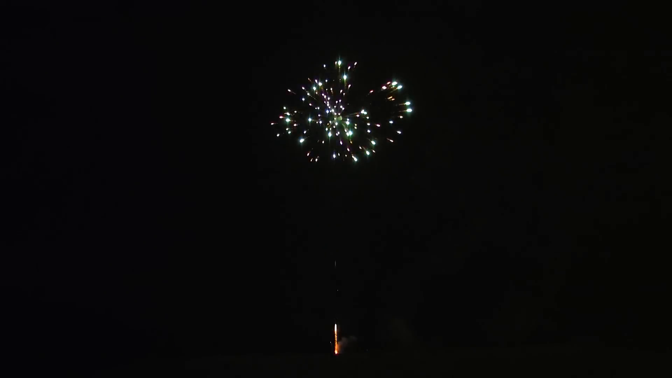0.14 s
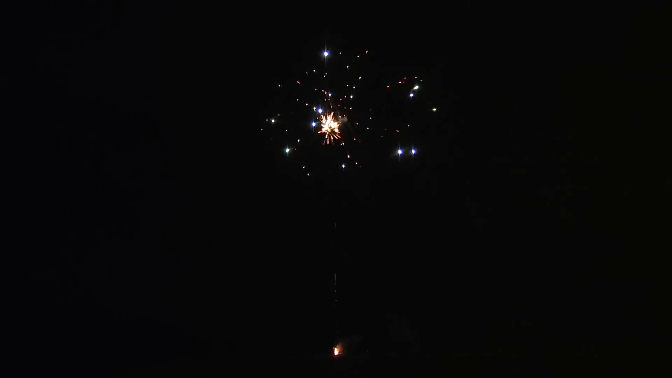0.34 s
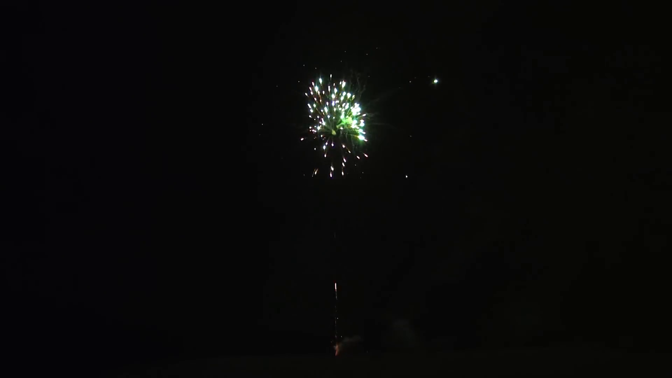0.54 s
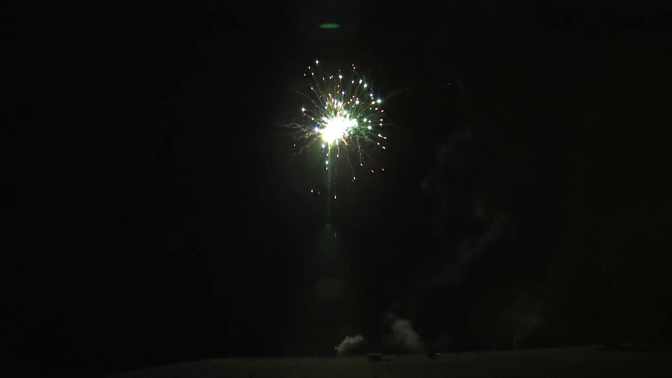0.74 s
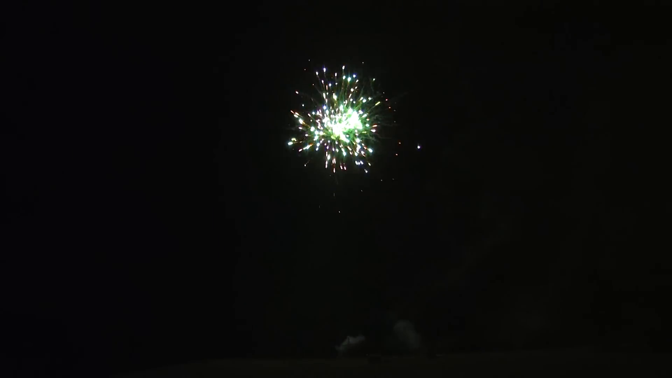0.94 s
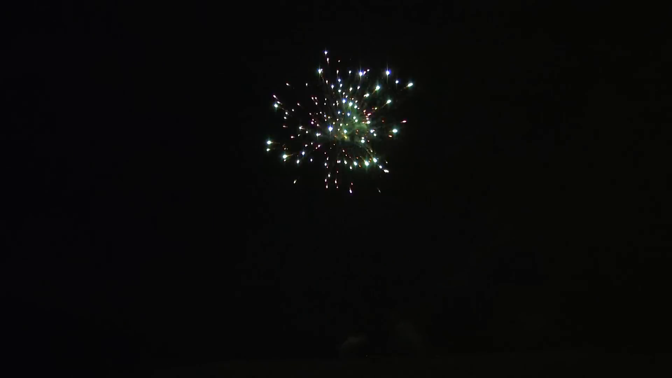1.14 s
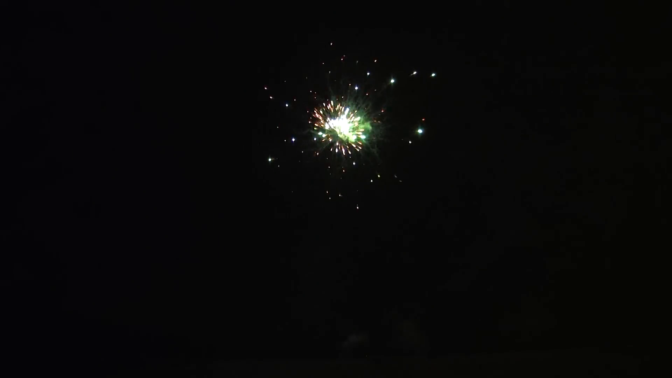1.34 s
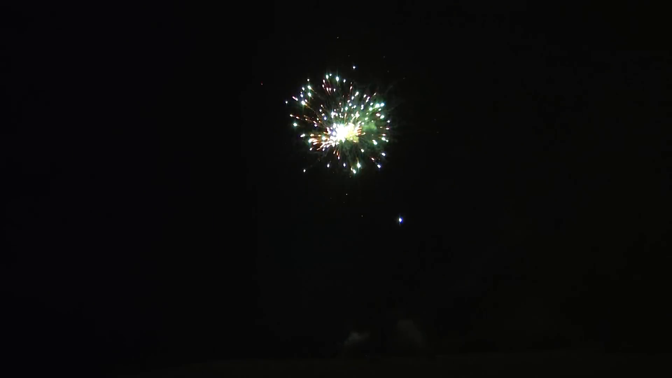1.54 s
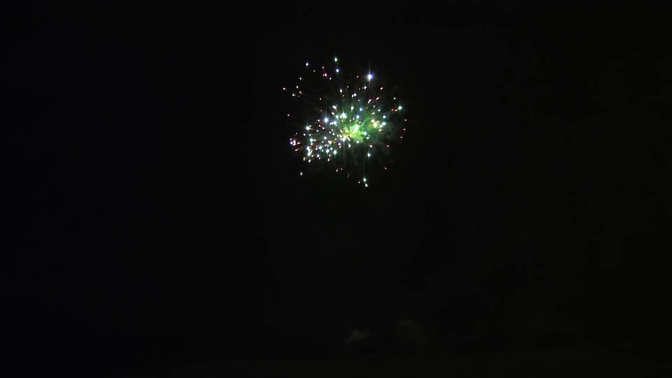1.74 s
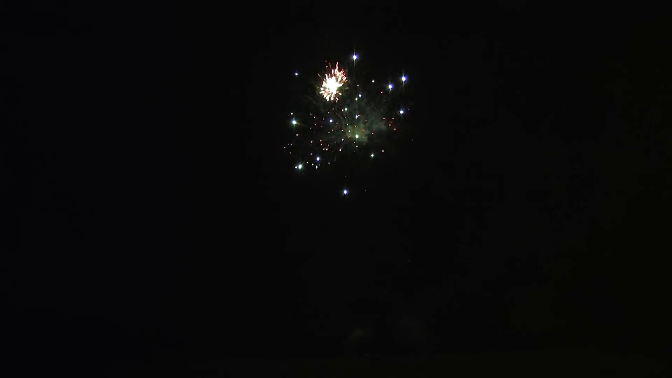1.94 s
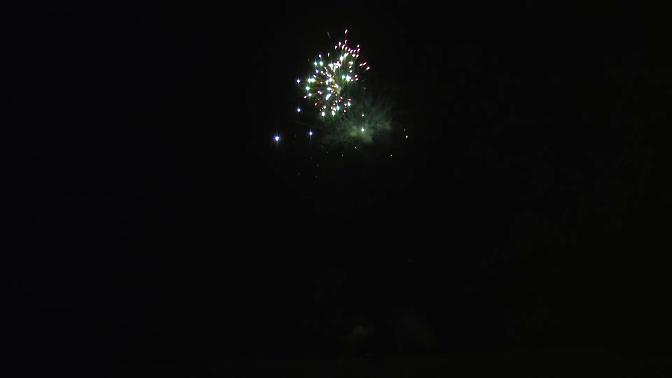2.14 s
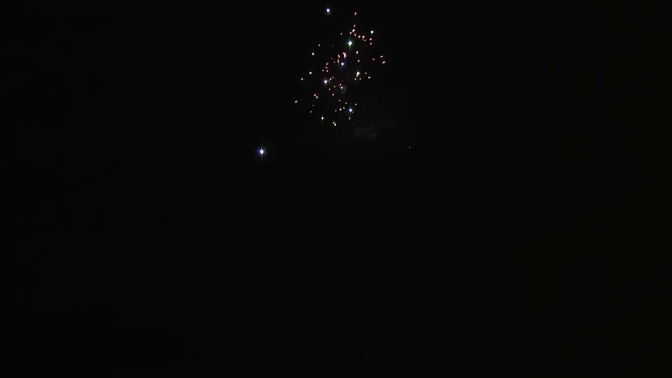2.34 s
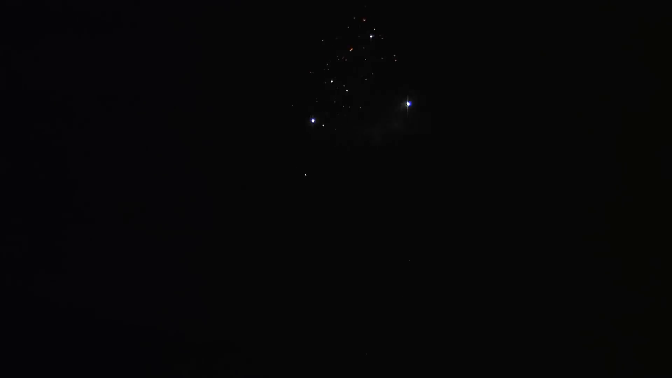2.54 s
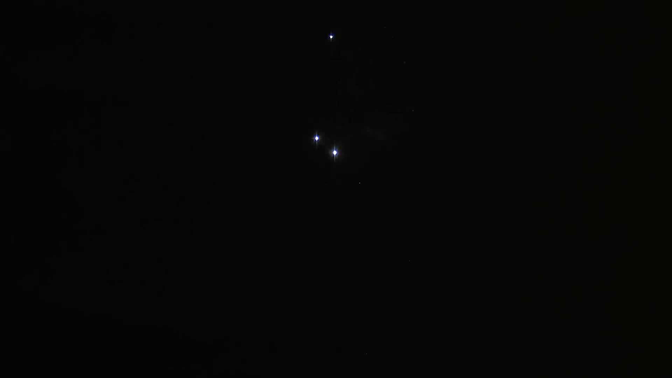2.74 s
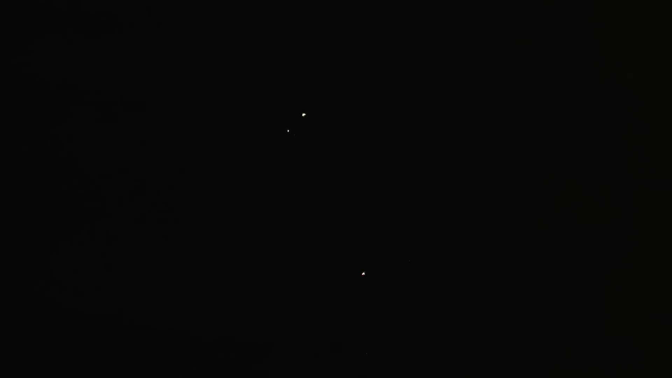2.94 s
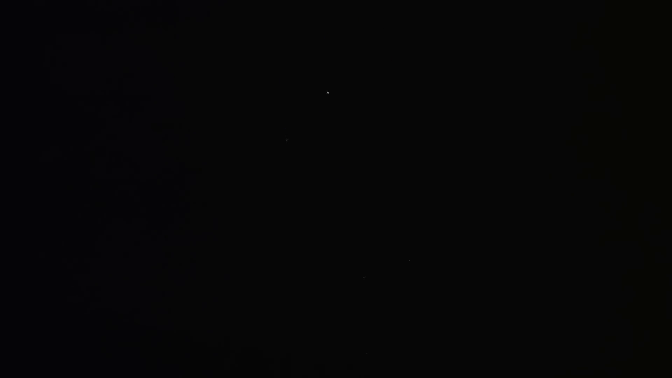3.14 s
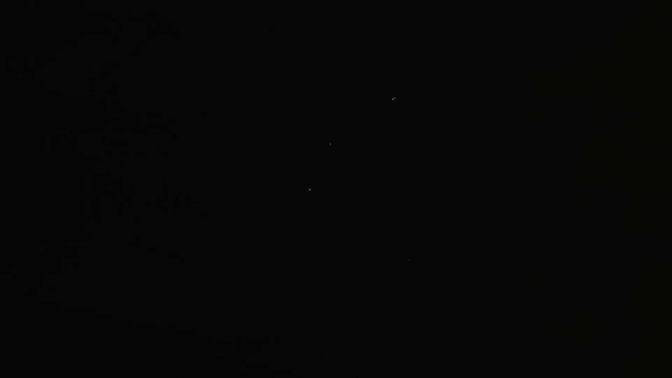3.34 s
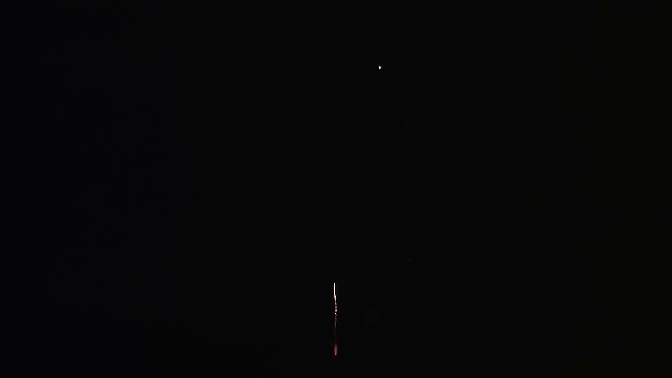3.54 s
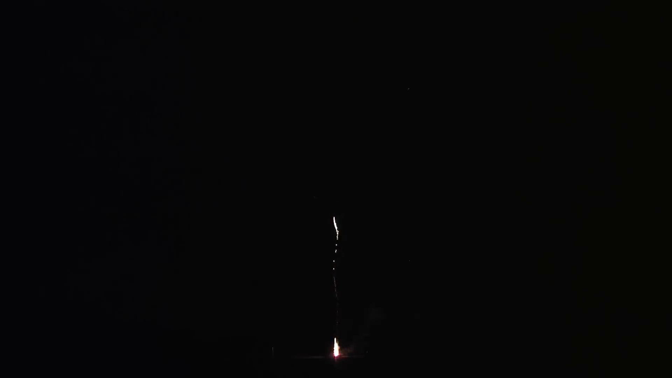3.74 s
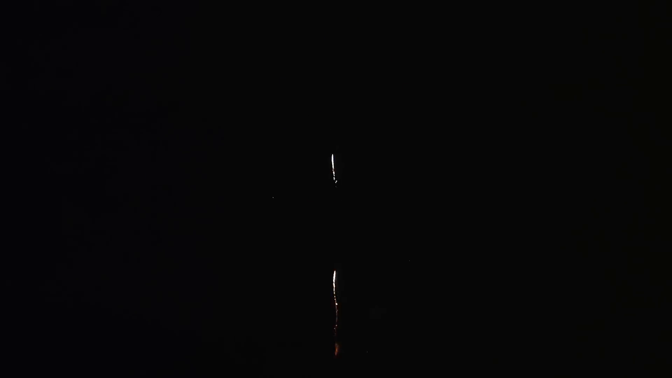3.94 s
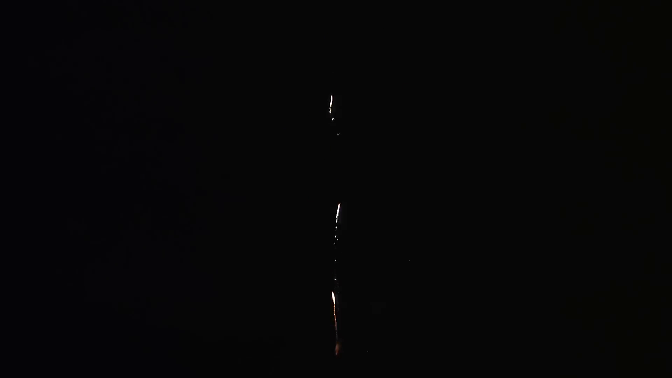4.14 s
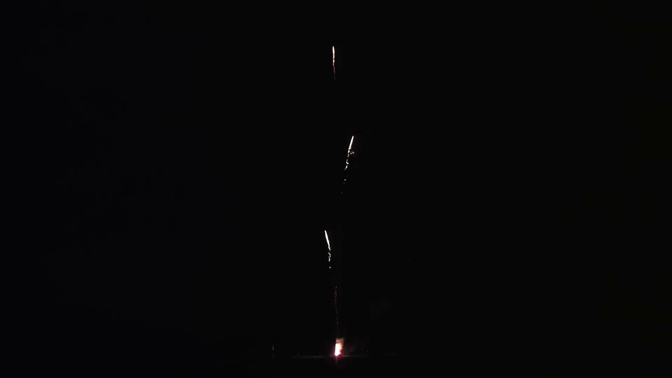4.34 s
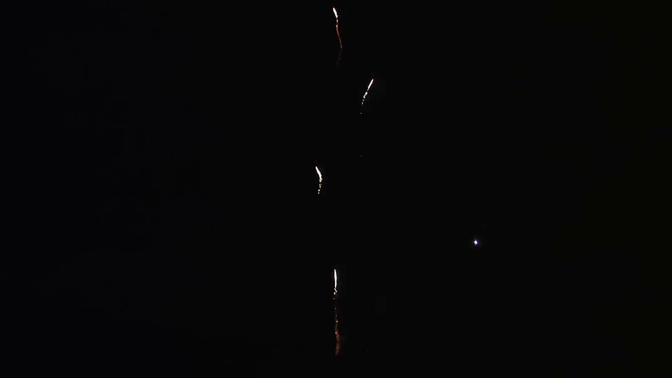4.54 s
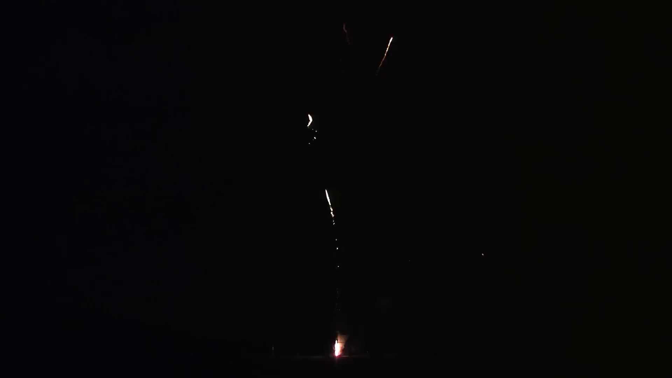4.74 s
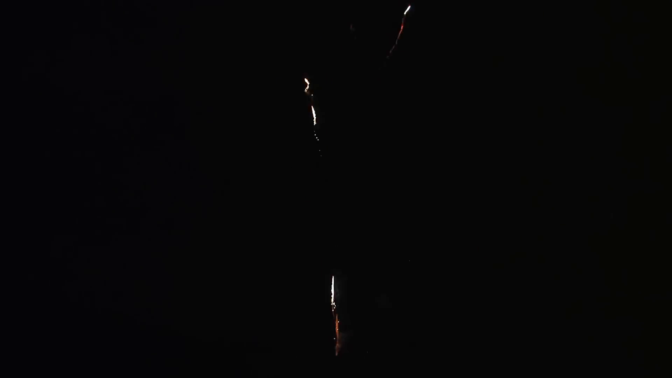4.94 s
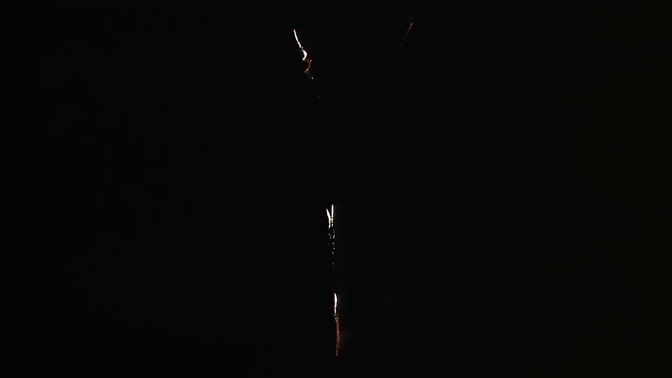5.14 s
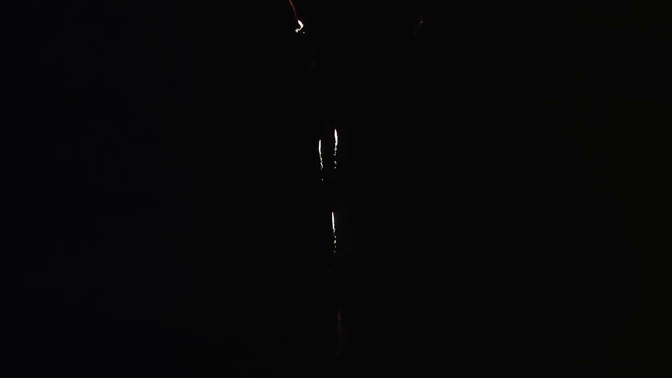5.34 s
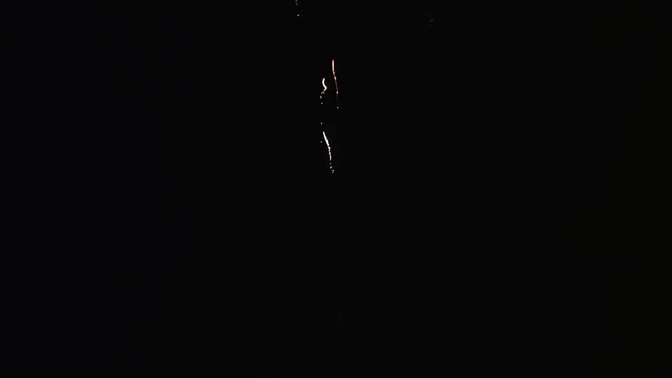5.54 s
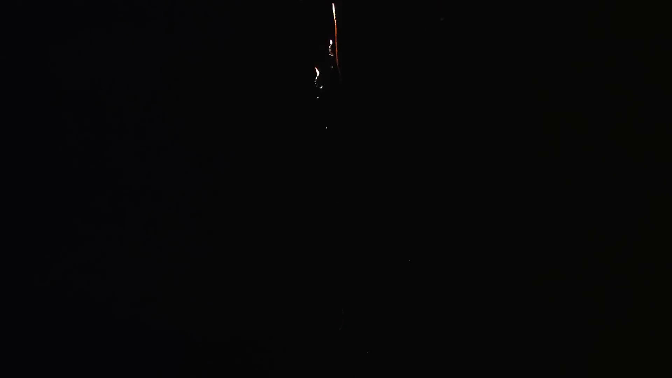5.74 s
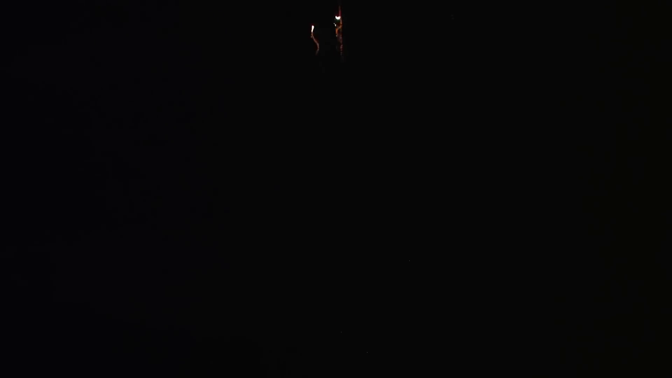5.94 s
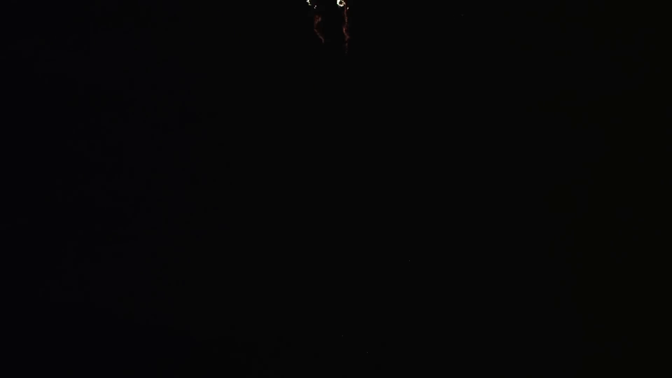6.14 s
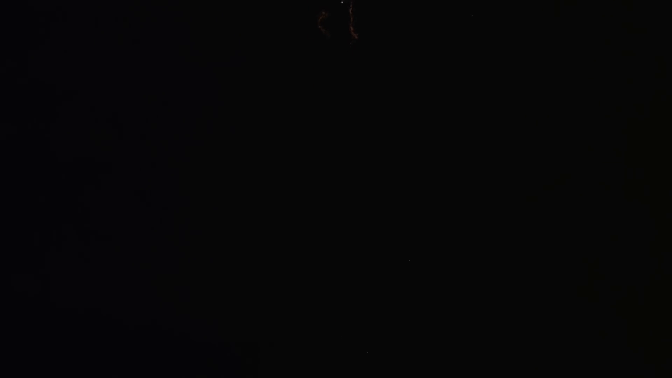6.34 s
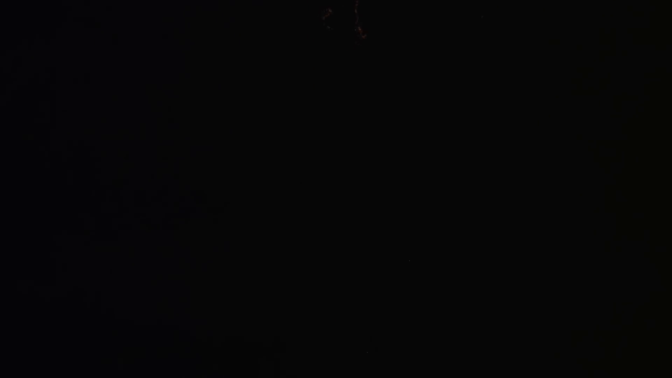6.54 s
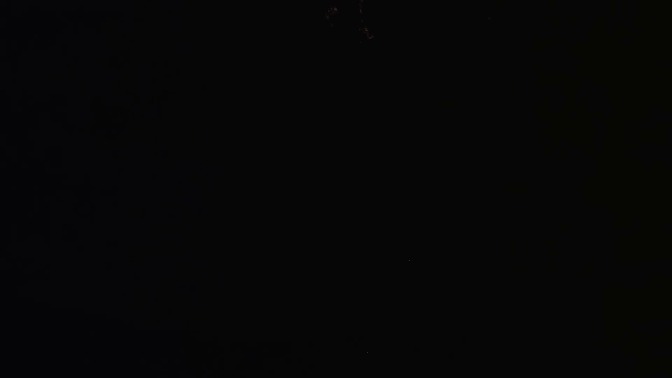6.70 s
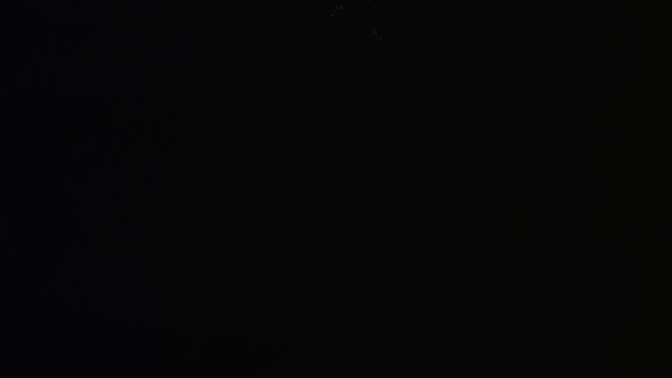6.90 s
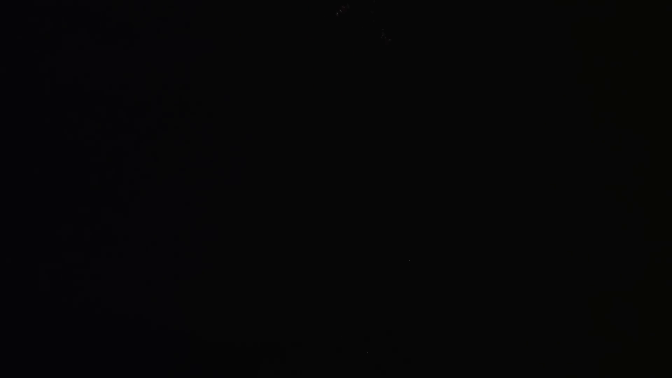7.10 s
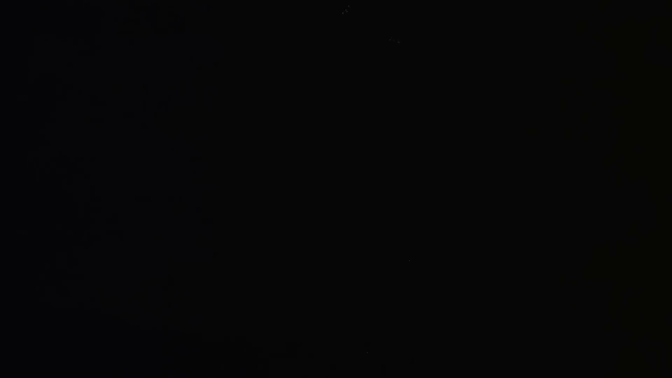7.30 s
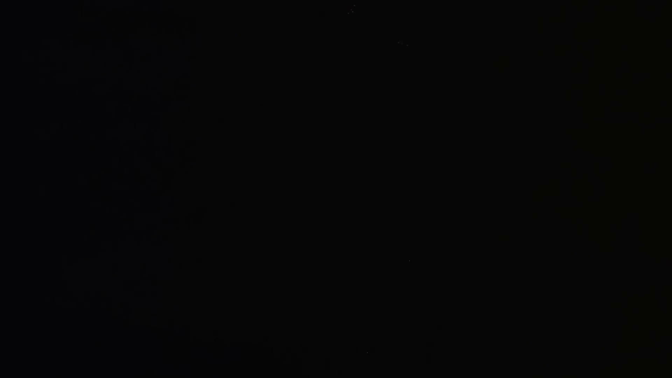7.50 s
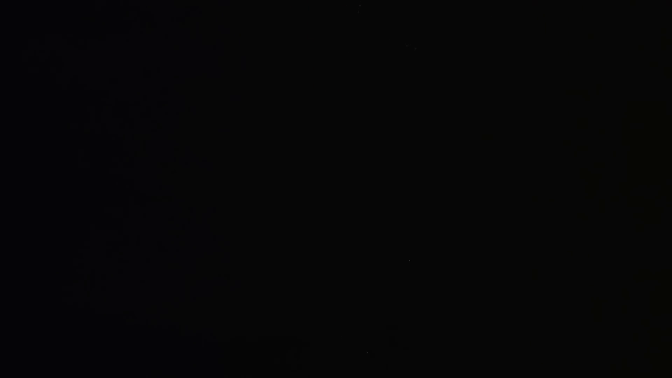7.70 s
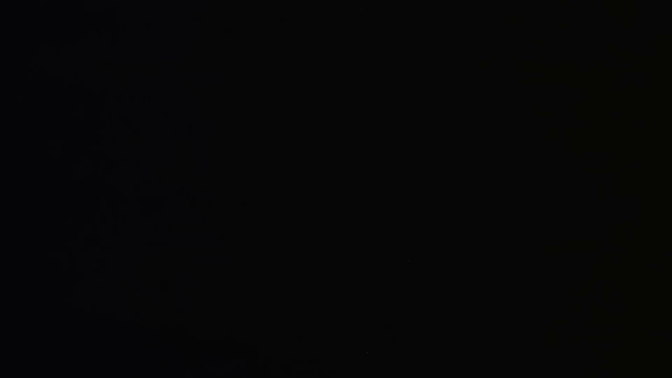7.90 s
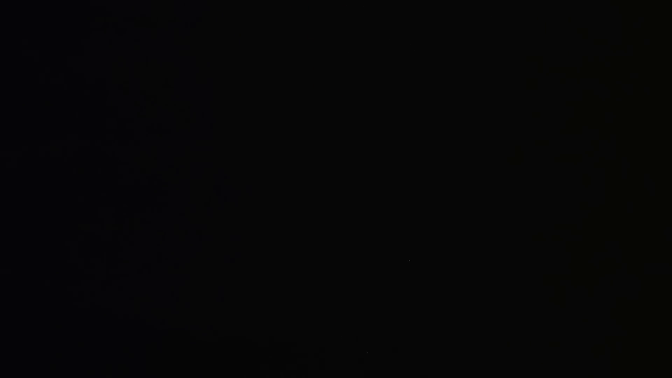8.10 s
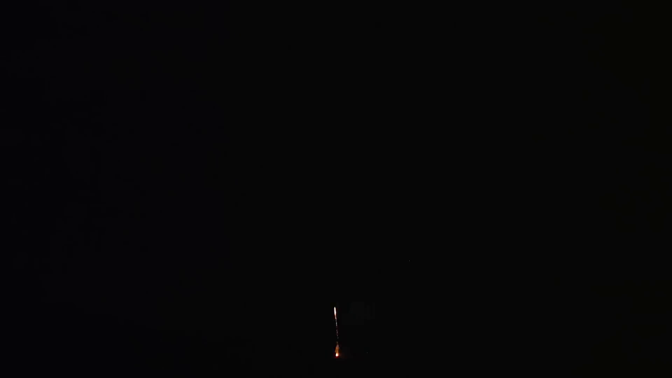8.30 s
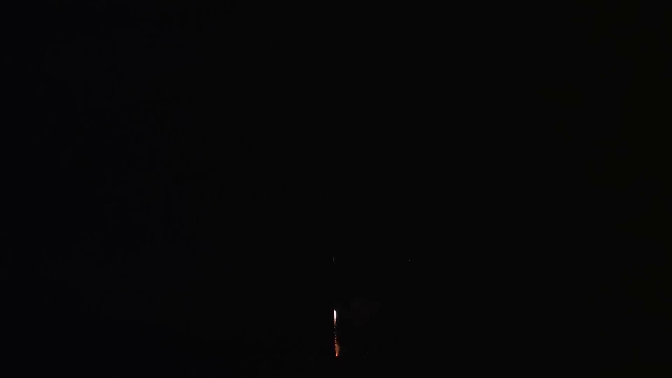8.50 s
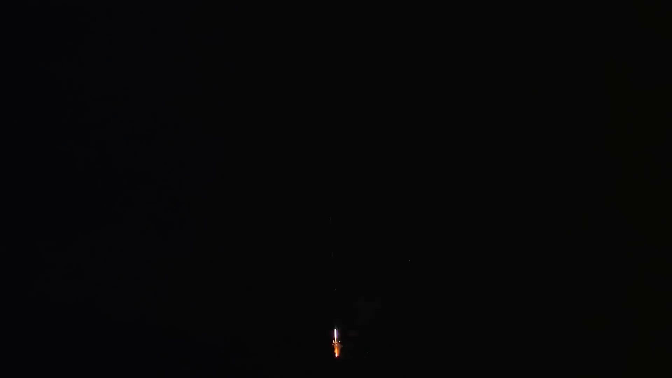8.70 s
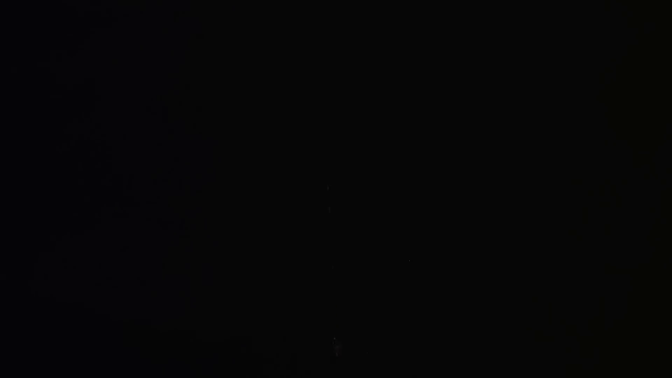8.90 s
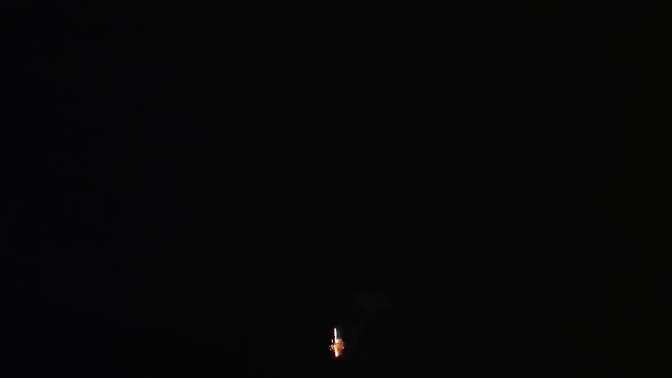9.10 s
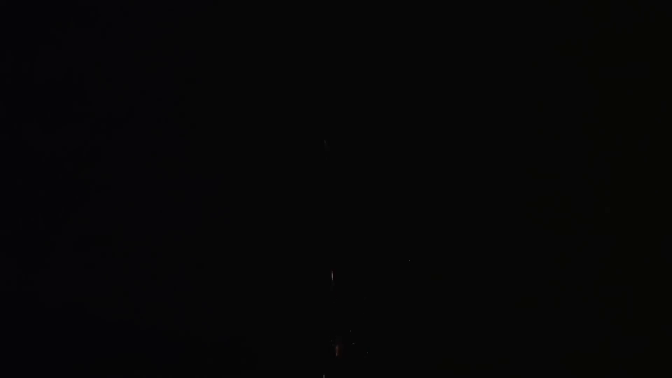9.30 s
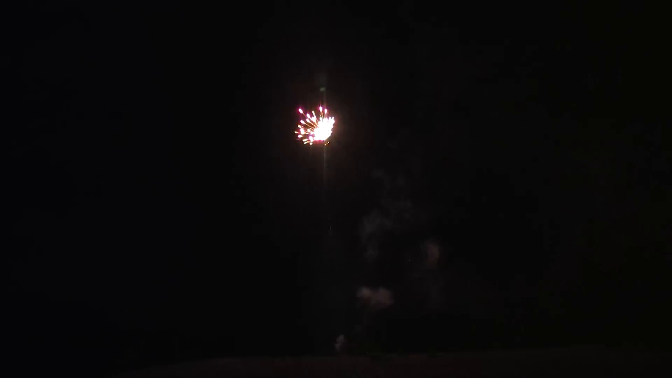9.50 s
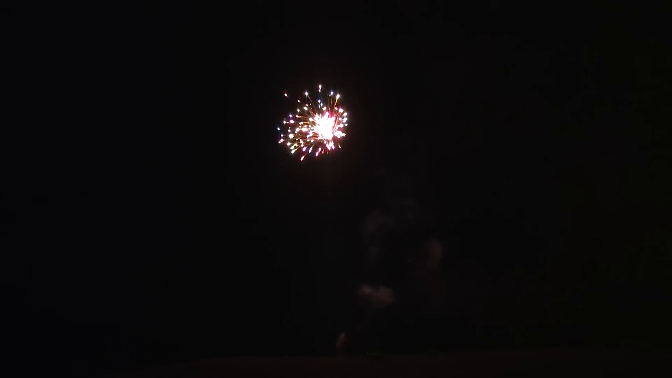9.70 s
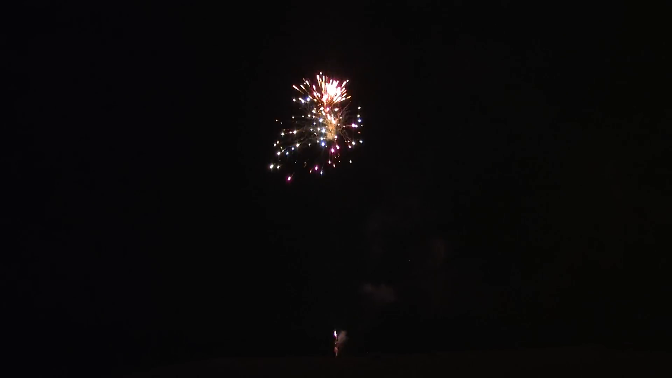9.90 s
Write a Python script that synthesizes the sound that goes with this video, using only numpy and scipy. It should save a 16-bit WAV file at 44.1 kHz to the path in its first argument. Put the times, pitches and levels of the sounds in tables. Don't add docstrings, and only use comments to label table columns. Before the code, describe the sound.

Sharp firework explosions with rolling echoes, then overlapping hissing screamers sinking in pitch, a short lull, four ground-level launch cracks and closing bangs.

```python
import sys
import numpy as np
from scipy import signal
from scipy.fft import rfft, irfft, next_fast_len
from scipy.io import wavfile
from scipy.ndimage import uniform_filter1d

SR = 44100
rng = np.random.default_rng(int(sys.argv[2]) if len(sys.argv) > 2 else 0)


def gain_from_db(level_db):
    decades = np.asarray(level_db, float) / 20
    return 10 ** decades


def unload_audio(sound):
    columns = np.transpose(np.atleast_2d(sound))
    steps = np.round(np.clip(columns, -1, 1) * 32767)
    wavfile.write(sys.argv[1], SR, steps.astype(np.int16))


N = 438794
LEAD = 200


def shock(push_ms, ring_hz, width_hz, ring_share):
    sample = np.arange(900)
    t = np.maximum(sample - LEAD, 0) / SR * 1000 / push_ms
    wave = -(1 - t) * np.exp(-.6 * t) * (sample >= LEAD)
    r = np.exp(-np.pi * width_hz / SR)
    resonance = [1, -2 * r * np.cos(2 * np.pi * ring_hz / SR), r * r]
    ring = signal.lfilter([1, 0, -1], resonance, wave)
    return wave + ring_share * ring / np.abs(ring).max()


def bursts(place):
    # (time [s], overload ceiling [dB], ground echo lag [ms], ground echo [dB],
    # relative length of the pressure wave [ratio])
    shells = [
        (0.0342, -6.5, 4.9, 2, 0.92),
        (0.5127, -7, 4.7, 1.7, 0.89),
        (0.861, -6.5, 4.9, 0, 0.86),
        (0.9744, -14, 5, 0.5, 0.91),
        (1.4299, -6.5, 4.7, 1.8, 0.87),
        (1.6328, -11, 4.66, 0, 0.9),
        (2.075, -6.5, 5.46, 1.8, 0.94),
        (9.5456, -8.5, 4.5, -1, 0.76),
        (9.723, -12, 4.88, -1, 0.82),
    ]
    # (lag [ms], left [dB], right [dB])
    walls = [(1.95, -0.5, -10), (7.95, -12, -2.5), (9.3, -52, -52), (12.17, -29, -29), (14.35, -34, -17),
             (16.05, -2.5, -10), (31.8, -51, -17), (84.2, -40, -6.5), (96.2, -23, -2), (110, -50.5, -19),
             (126, -40, -6.5), (139, -42, -14.5)]
    # (frequency [Hz], level per Hz [dB])
    echo_colour = [(35, -58), (60, -8.5), (119, -5.5), (215, -9.5), (364, -0.5), (674, 1.5), (827, -5),
                   (1220, -10), (1880, -11.5), (7740, -25.5), (14000, -68)]
    glint_ms, glint_cut_hz, glint_db = 119, 5000, -6
    bass_cut = signal.butter(2, 280, "high", fs=SR, output="sos")
    glint_cut = signal.butter(2, glint_cut_hz, "high", fs=SR, output="sos")
    out, t = np.zeros((2, N)), np.arange(SR // 5) / SR
    swing = 0.031 * np.sin(2 * np.pi * 85 * t) * t / .05 * np.exp(1 - t / 0.026)
    settle = swing * np.array([[.3], [1.2]])
    for s, top_db, lag_ms, ground_db, size in shells:
        wave = shock(push_ms=0.21 * size, ring_hz=520 / size, width_hz=840, ring_share=0.24)
        wave = signal.sosfiltfilt(bass_cut, dull(wave, 13000))
        s0 = s - LEAD / SR
        add(out, s0, gain_from_db(top_db + 7.5) * np.clip(14.2 * wave, -1, 1))
        add(out, s0 + lag_ms / 1000, gain_from_db(ground_db) * dull(np.clip(3.1 * wave, -1, 1), 3700))
        shifts = rng.normal(0, 1, (len(walls), 3))
        for (lag, left_db, right_db), (shift, left, right) in zip(walls, shifts):
            echo = smear(dull(wave, 1900), lag) * gain_from_db(ground_db)
            gains = sides(left_db + 0.74 * left, right_db + 2.7 * right)
            add(out, s0 + lag * (1 + 0.01045 * shift) / 1000, echo * gains)
        points = [(hz / size ** 0.53, db) for hz, db in echo_colour]
        add(out, s, gain_from_db(ground_db - 38.0) * answer(place, points))
        add(out, s, gain_from_db(ground_db) * settle)
        glint = dull(signal.sosfilt(glint_cut, wave), 6700)
        add(out, s0 + glint_ms / 1000, gain_from_db(glint_db) * smear(glint, 30.0))
    return out


def lifts(place):
    # (time [s], level [dB], muzzle crack over the pop [dB])
    charges = [(0.0169, -11.5, 4.5), (0.266, -12.5, 1), (3.5656, -8, 8), (3.917, -13, -5),
               (4.162, -16.5, -39), (4.5325, -14, -43), (4.915, -16, -8), (4.9996, -12.5, 5),
               (5.218, -12, -1), (8.3662, -9.5, 6), (8.593, -9.5, 6.5), (8.855, -8.5, 9.5),
               (9.241, -10.5, 8)]
    # (lag [ms], left [dB], right [dB])
    low_walls = [(4.28, -19.5, -15), (10.37, -15, -14), (65, -43, -19.5), (80.6, -31, -15),
                 (127, -44, -15.5)]
    # (frequency [Hz], level per Hz [dB])
    echo_colour = [(35, -4), (60, -0.5), (348, 4), (561, -12), (705, -11), (2470, -6.5), (2900, -13),
                   (3330, -8.5), (7910, -19.5), (14000, -51)]
    crack = shock(push_ms=0.18, ring_hz=2800, width_hz=9000, ring_share=0.16)
    bounce = 0.44 * np.roll(crack, round(.58 * SR / 1000))
    crack = dull(crack + bounce, 6300)
    pop = dull(shock(push_ms=0.79, ring_hz=383, width_hz=330, ring_share=0.68), 1400)
    bass_cut = signal.butter(1, 170, "high", fs=SR, output="sos")
    crack, pop = signal.sosfiltfilt(bass_cut, [crack, pop])
    out, echo = np.zeros((2, N)), answer(place, echo_colour)
    for s, level_db, crack_db in charges:
        wave = gain_from_db(level_db) * (gain_from_db(crack_db) * crack + 0.61 * pop)
        s0 = s - (LEAD + 8) / SR
        add(out, s0, wave)
        for lag, left_db, right_db in low_walls:
            reflection = smear(dull(wave, 1500 + 22 * lag), lag)
            add(out, s0 + lag / 1000, reflection * sides(left_db, right_db))
        add(out, s, gain_from_db(level_db - 41.5) * echo)
    return out


def whistle(rows, swerves, flutter, wobble):
    # (multiple of the strongest [ratio], level under it [dB])
    partials = [(.5, -24.5), (1.5, -21), (2.0, -12), (2.5, -18.5), (3.0, -15.5), (3.5, -16), (4.0, -27),
                (4.5, -32.5), (5.0, -39), (6.0, -44)]
    swing_back_hz_per_s, swerve_loss_db_per_hz = 2200, .006
    sputter_db, sputter_per_s = 2, 10
    wander, wander_per_s = .011, 10
    overtone_growth = 0.26
    ground_db, ground_shift = -9.5, .016
    rasp, rasp_hz = 0.48, 119
    span = slice(round(rows[0][0] * SR), round(rows[-1][0] * SR))
    hz, level_db = (c[span] for c in in_time(rows))
    n, t = len(hz), np.arange(len(hz)) / SR
    for s, up_hz, rise_s in swerves:
        moments = [s - rise_s, s, s + up_hz / swing_back_hz_per_s]
        swing_hz = np.interp(t + rows[0][0], moments, [0, up_hz, 0])
        hz, level_db = hz + swing_hz, level_db - swerve_loss_db_per_hz * swing_hz
    hz = uniform_filter1d(hz, size=600, mode="nearest")
    on = np.clip(np.minimum(t, t[-1] - t) / 0.0073, 0, 1)
    sputter = sputter_db * drift(sputter_per_s, size=n) * np.minimum(t / .3, 1)
    level_db = np.minimum(level_db + sputter, -17.0)
    unsteady = 1 + wobble * drift(45.9, size=n) + wander * drift(wander_per_s, size=n)
    phase = 2 * np.pi * np.cumsum(hz * unsteady) / SR
    odd = gain_from_db(3.0 * drift(3, size=n))
    odd = odd * np.interp(hz, [1400, 2070, 2350, 2600], [0.1, 1, 0.75, .1])
    overtones = 0
    for k, db in partials:
        if k > 2.25:
            waver = 0.72 + rasp * drift(rasp_hz, size=n)
        else:
            waver = 0.8 + 0.39 * drift(35, size=n)
        alternation = odd if k % 1 > .25 else 1
        overtones += gain_from_db(db) * np.sin(k * phase) * alternation * waver
    beats = 1 + flutter * drift(21, size=n)
    recession = np.gradient(phase) * (1 + .4 * drift(3.033, size=n))
    mirror = gain_from_db(ground_db) * np.sin(phase - ground_shift * np.cumsum(recession))
    growth = gain_from_db(overtone_growth * (level_db + 28))
    tone = (np.sin(phase) + mirror) * beats + overtones * growth
    sway = gain_from_db(.5 * drift(0.52, size=n) * np.array([[1], [-1]]))
    return np.sqrt(2) * tone * on * gain_from_db(level_db) * sway


def whistles():
    # (time [s], pitch [Hz], rms level [dB])
    comet_1 = [(3.766, 2225, -19.5), (3.92, 2010, -24), (4.1, 1970, -23.5), (4.27, 1916, -25.5),
               (4.5, 1780, -62), (4.93, 1606, -39), (5.09, 1560, -28), (5.75, 1513, -44.5),
               (6.45, 1400, -33)]
    comet_2 = [(4.066, 2256, -25.5), (4.201, 2085, -26.5), (4.351, 2013, -22), (4.62, 1896, -28.5),
               (4.85, 1772, -24), (5.049, 1670, -34), (5.3, 1612, -26), (5.65, 1632, -28),
               (6.4, 1475, -34.5)]
    comet_3 = [(4.35, 2255, -29.5), (4.6, 2052, -23.5), (4.752, 1930, -32.5), (5.14, 1837, -28.5),
               (5.46, 1819, -49), (5.8, 1732, -28), (6.2, 1550, -31.5), (6.6, 1395, -31),
               (7.151, 1378, -21.5)]
    comet_4 = [(4.591, 2360, -30.5), (4.68, 2200, -25), (4.88, 2070, -27), (5.18, 1950, -26),
               (5.6, 1870, -27.5), (6.0, 1800, -32.5), (6.3, 1620, -28.5), (6.7, 1560, -27.5),
               (6.898, 1440, -29.5)]
    comet_5 = [(4.97, 2267, -27), (5.2, 2122, -24.5), (5.4, 2000, -27), (5.68, 1991, -26.5),
               (5.85, 1815, -29.5), (6.17, 1751, -23), (6.43, 1637, -27), (6.88, 1572, -30.5),
               (7.198, 1455, -26.5)]
    comet_6 = [(5.11, 2280, -26.5), (5.27, 2060, -36), (6.1, 1861, -27), (6.32, 1680, -25.5),
               (6.82, 1651, -27.5), (7.16, 1502, -28.5), (7.27, 1471, -19), (7.639, 1393, -22),
               (8.099, 1474, -39.5)]
    comet_7 = [(5.29, 2308, -17), (5.36, 2105, -33), (5.619, 1866, -32), (6.3, 1735, -53),
               (6.779, 1760, -32), (7.2, 1555, -32.5), (7.399, 1454, -29), (7.72, 1458, -27),
               (7.961, 1480, -34)]
    # (time of top [s], rise [Hz], rise time [s])
    tumbles = [
        [],
        [(4.83, 70, 0.031), (4.9, 110, 0.031), (5.13, 100, 0.027), (5.37, 150, .02)],
        [(4.73, 60, .02), (4.96, 159.8, 0.037), (5.05, 150, .04)],
        [],
        [(5.93, 260, 0.073), (6.77, 90, 0.041), (6.98, 100, 0.079)],
        [(5.67, 220, .17), (6.05, 220, .1), (6.19, 210, .02), (6.98, 300, 0.14), (7.11, 320, .05),
         (7.67, 90, 0.021)],
        [(6.88, 150, 0.075), (7.27, 330, 0.049), (7.5, 110, 0.044), (7.8, 200, 0.073), (7.94, 240, 0.067)],
    ]
    # (start [s], end [s], start pitch [Hz], end pitch [Hz], level [dB])
    squeals = [
        (3.688, 3.772, 2870, 2620, -23),
        (3.967, 4.064, 2700, 2740, -25.5),
        (4.29, 4.356, 2670, 2740, -27),
        (4.566, 4.598, 2960, 2860, -28),
        (5.085, 5.116, 2800, 2742, -27),
        (5.257, 5.293, 2820, 2740, -25),
    ]
    choir = [comet_1, comet_2, comet_3, comet_4, comet_5, comet_6, comet_7]
    tracks = list(zip(choir, tumbles))
    for start, end, start_hz, end_hz, db in squeals:
        tracks.append(([(start, start_hz, db - 11.5), (end, end_hz, db)], []))
    out = np.zeros((2, N))
    for rows, swerves in tracks:
        add(out, rows[0][0], whistle(rows, swerves, flutter=0.16, wobble=0.00393))
    return out - 0.66 * signal.lfilter(*signal.iirpeak(4150, 4150 / 1400, fs=SR), out)


def stalled(tones):
    # (time of restart [s], peak after it [dB])
    stalls = [(6.3744, -31), (6.4194, -31), (6.457, -31), (6.5222, -27), (6.5602, -28), (6.5995, -31),
              (6.66, -24.5), (6.7763, -17), (7.2606, -33), (7.329, 3), (7.4096, -15), (7.4566, -7),
              (7.556, -4), (7.598, -30), (7.7003, -30)]
    floor_db = -33
    main_band = signal.butter(2, [1000, 2350], "band", fs=SR, output="sos")
    main = signal.sosfiltfilt(main_band, tones)
    dips = []
    for s, peak_db in stalls:
        depth_db = min(floor_db - peak_db, 0)
        for lag_s, share in [(-.02, 0), (-.01, 1), (0, 1), (.003, 0)]:
            dips.append((s + lag_s, share * depth_db))
    return tones - main * (1 - gain_from_db(in_time(dips)[0]))


def jets():
    # (time [s], level [dB])
    strength = [(3.66, -84), (3.77, -32.5), (4.57, -30), (4.911, -34.5), (5.31, -31.5), (6.22, -31.5),
                (6.32, -38), (7.82, -35.5), (8.151, -63)]
    # (frequency [Hz], level [dB])
    hiss_colour = [(300, -19), (600, -8.5), (1100, -2), (1900, 8.5), (2600, 4.5), (3200, 3), (4200, -3.5),
                   (5300, 3), (7200, -0.5), (9500, -10), (13600, -32), (15000, -60)]
    t = np.arange(N) / SR
    before, after = (strength[0][0] - .01, -90), (strength[-1][0] + 0.08, -90)
    jet_db, = in_time([before] + strength + [after])
    height = np.clip((t - 5.7) / 1.67, 0, 1)
    puffs_db = 2.96 * drift(22) + 0.5 * drift(250) + (1.14 + 0.95 * height) * drift(9.8)
    near = colour(stereo_noise(N, alike=0.95), hiss_colour) * gain_from_db(jet_db + puffs_db)
    far = dull(near, 5970) + 0.58 * near
    far = far - .6 * signal.lfilter(*signal.iirpeak(2400, 2400 / 900, fs=SR), far)
    return near + height * (far - near)


def comets(place):
    sound = stalled(whistles()) + jets()
    blurred = sound.mean(axis=0) * drift(90)
    t = np.arange(place.shape[1]) / SR
    return sound + gain_from_db(-61.5) * echoed(blurred, rms_one(place * gain_from_db(-4.0 * t)))


def surroundings(scatter, air_db, lumpy_db, late_left_db):
    t = np.arange(3 * SR) / SR
    white = rfft(stereo_noise(len(t), alike=0.33))
    octave = np.log2(np.clip(np.fft.rfftfreq(len(t), 1 / SR) / 500, 1, 32))
    out = 0
    for k in range(6):
        band = irfft(white * np.maximum(1 - np.abs(octave - k), 0), len(t))
        out = out + band * gain_from_db(-air_db * t * (2 ** k / 2) ** 0.67)
    lumps_db = lumpy_db * drift(110, size=len(t)) * np.exp(-t / 0.29)
    lean_db = late_left_db * np.clip(t - .3, 0, .4) * np.array([[1], [-1]])
    return out * gain_from_db(np.interp(t, *np.transpose(scatter)) + lumps_db + lean_db)


def answer(place, points):
    return colour(place, points) * np.clip(np.linspace(10, 0, place.shape[1]), 0, 1)


def smear(wave, lag_ms):
    t_ms = np.arange(400) / SR * 1000
    grains = rng.standard_normal((2, 400)) ** 3 * np.exp(-t_ms / (0.029 + 0.091 * lag_ms))
    grains[:, 0] = 9.0
    grains = grains / np.sqrt((grains ** 2).sum(axis=1, keepdims=True))
    return signal.fftconvolve(wave[None], grains, axes=1)


def night():
    # (time [s], level [dB])
    background = [(0.0, -49), (0.41, -53), (1.5, -53.5), (6.71, -61), (8.59, -59.5), (9.95, -57.5)]
    # (frequency [Hz], level per Hz [dB])
    floor_colour = [(15, -57), (25, 2), (155, -11.5), (392, -4), (554, 1), (966, -19), (1470, 1),
                    (1820, -12), (7220, -35), (13600, -39.5), (14600, -60)]
    rumble_colour = [(25, -9), (50, -15.0), (66, 7.5), (85, -7.5), (160, -3.0), (300, -61.5), (600, -63)]
    level_db, = in_time(background)
    rumble = colour(stereo_noise(N, alike=0.89), rumble_colour)
    hiss = colour(stereo_noise(N, alike=0.61), floor_colour)
    return gain_from_db(level_db) * (gain_from_db(7.5) * rumble + gain_from_db(9.5) * hiss)


def rms_one(x):
    return x / np.sqrt(np.mean(x ** 2) + 1e-20)


def in_time(rows):
    s, *columns = np.transpose(rows)
    return [np.interp(np.arange(N) / SR, s, c) for c in columns]


def colour(x, points):
    size = next_fast_len(x.shape[-1])
    hz = np.maximum(np.fft.rfftfreq(size, 1 / SR), 1)
    point_hz, point_db = np.array(points).T
    shape = np.interp(np.log(hz), np.log(point_hz), point_db)
    return rms_one(irfft(rfft(x, size) * gain_from_db(shape), size)[..., :x.shape[-1]])


def stereo_noise(size, alike):
    mid, side = rng.standard_normal((2, size))
    return np.sqrt(1 + alike) * mid + np.sqrt(1 - alike) * side * np.array([[1], [-1]])


def drift(rate, size=N):
    r = np.exp(-80 * np.pi * rate / SR)
    slow = signal.lfilter([1], [1, -2 * r, r * r], rng.standard_normal(N // 40 + 2002))[2000:]
    return np.interp(np.arange(size) / 40, np.arange(len(slow)), rms_one(slow))


def echoed(x, response):
    return signal.fftconvolve(np.atleast_2d(x), np.atleast_2d(response), axes=1)[:, :N]


def add(out, s, sound):
    i = round(s * SR)
    out[:, i:i + sound.shape[-1]] += sound[..., :N - i]


def sides(left_db, right_db):
    return gain_from_db(np.array([[left_db], [right_db]]))


def dull(x, cut_hz):
    return signal.sosfilt(signal.butter(2, min(cut_hz, 19000), fs=SR, output="sos"), x)


def scene():
    # (time [s], level [dB])
    sky_scatter = [(0, 9), (.012, -8.5), (.07, -13.5), (.082, -9), (.14, -4.5), (.25, -11.5), (1.0, -12.5),
                   (2.0, -17), (3.0, -28.5)]
    # (time [s], level [dB])
    ground_scatter = [(0, 21), (.008, 1), (.05, -7.5), (.06, -2), (.12, -2.5), (.2, -6.5), (.5, -33),
                      (1.0, -38), (3.0, -53)]
    sky = surroundings(sky_scatter, air_db=6.0, lumpy_db=3.5, late_left_db=3.0)
    ground = surroundings(ground_scatter, air_db=6.0, lumpy_db=3.0, late_left_db=0)
    return bursts(sky) + lifts(ground) + comets(sky) + night()


def roll_off(x):
    return signal.sosfilt(signal.butter(12, 16270, fs=SR, output="sos"), x)


def record(dry):
    fade = np.clip(np.arange(N) / SR / 0.014, .1, 1)
    overloaded = np.clip(dry * fade, -1.05, 1.05)
    top_cut = signal.cheby2(10, 60, 16300, fs=SR, output="sos")
    mix = np.clip(signal.sosfilt(top_cut, overloaded), -1, 1)
    return roll_off(mix)


dry = scene()
out = record(dry)
unload_audio(out)
```